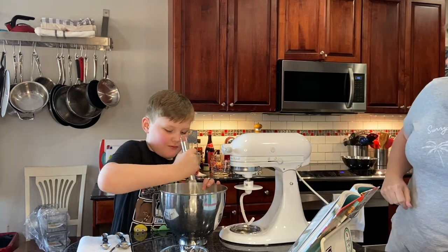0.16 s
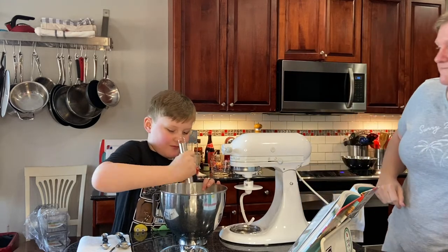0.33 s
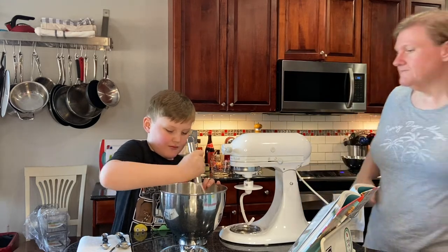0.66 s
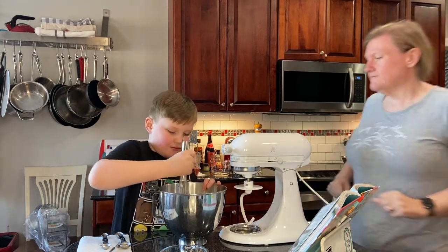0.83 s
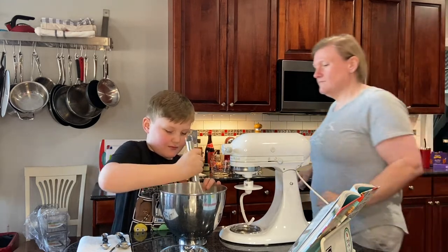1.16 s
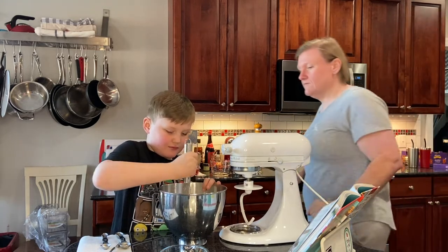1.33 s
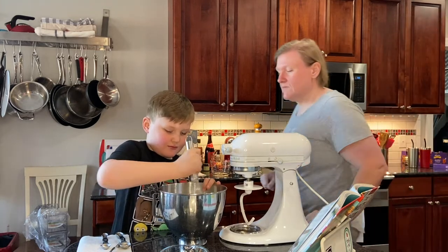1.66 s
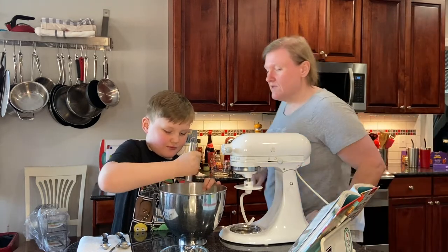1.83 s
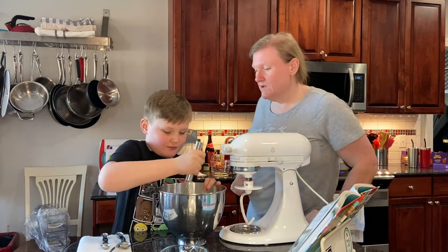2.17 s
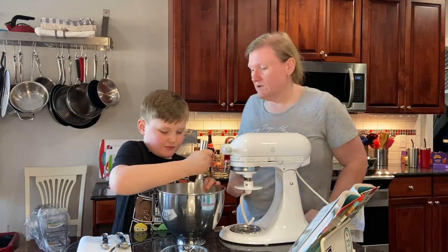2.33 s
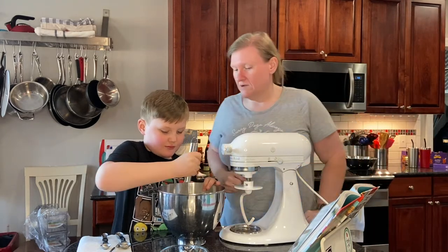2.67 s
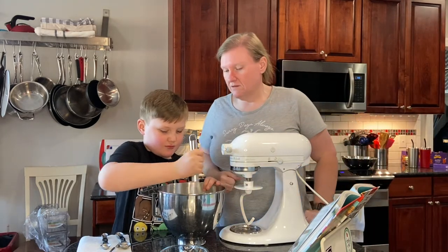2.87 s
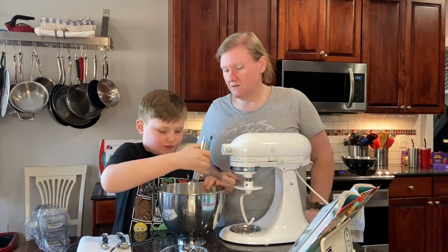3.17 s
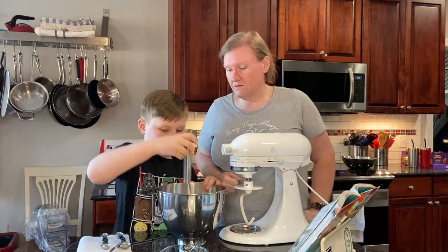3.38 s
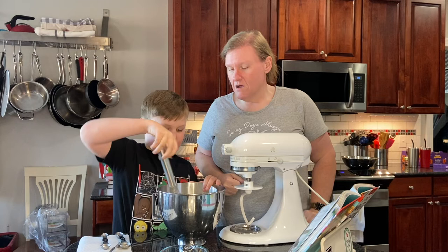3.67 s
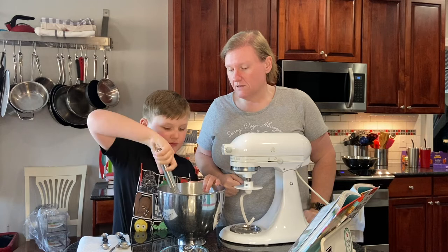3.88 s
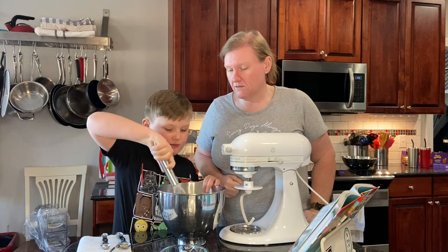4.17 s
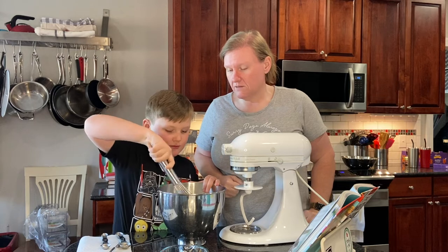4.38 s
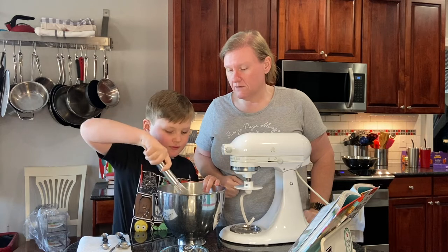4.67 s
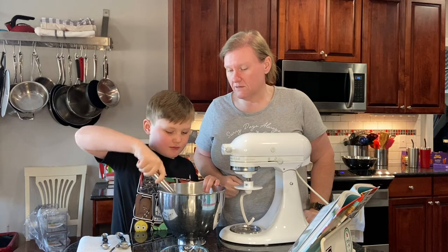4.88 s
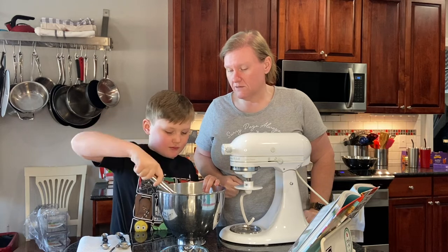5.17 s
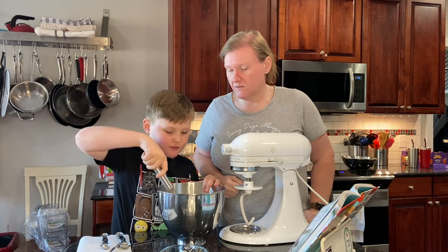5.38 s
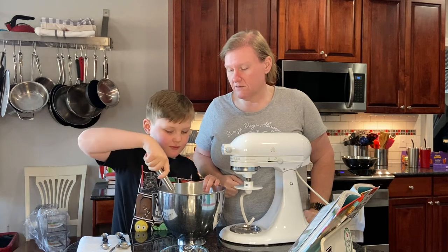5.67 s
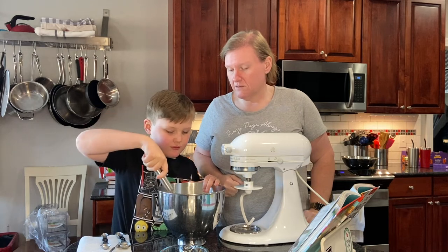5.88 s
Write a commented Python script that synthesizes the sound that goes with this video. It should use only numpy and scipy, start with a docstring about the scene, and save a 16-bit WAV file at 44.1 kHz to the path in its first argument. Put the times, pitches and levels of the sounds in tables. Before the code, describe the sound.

In a hard-walled home kitchen, a wire whisk drags through dry ingredients in a steel bowl. Bright, scratchy swishes come in uneven strokes with light ticks, small pings and a soft rustle, busiest in the first three seconds. Stirring thins out, then one hard knock near five seconds makes the bowl ring. Dull soft thuds and a faint low hum sit beneath, picked up by a phone at moderate distance.

```python
"""A hard-walled kitchen: a wire whisk is dragged round a steel bowl of dry mix, heard by a phone. The strokes
are bursts of uneven random slips through wire resonances, with a rustle of mix beneath. Wires tick and clack on
the wall among short damped notes of wires and bowl, and the scene opens on a fading clang; damped sines ring
and rock the bowl, most strongly at one knock near five seconds. A few soft thuds are low decaying sines with a
scuff. Everything struck feeds a diffuse noise tail, over room tone and a wavering low hum of filtered noise."""
import sys
import numpy as np
from scipy import signal
from scipy.fft import rfft, irfft, next_fast_len
from scipy.io import wavfile
from scipy.ndimage import uniform_filter1d, map_coordinates

SR = 44100
rng = np.random.default_rng(int(sys.argv[2]) if len(sys.argv) > 2 else 0)


def master(y):
    """Save y as 16-bit WAV."""
    cut = np.clip(np.atleast_2d(y).T, -1, 1)
    pcm = np.round(cut * 32767)  # scale
    wavfile.write(sys.argv[1], SR, pcm.astype(np.int16))


N = 264952
SIZE = next_fast_len(N + SR)  # transform length: the scene plus one second of echo
FREQ = np.maximum(np.arange(SIZE // 2 + 1) * SR / SIZE, 1.)  # Hz of each bin
CONTACT_S = 0.0011  # time constant of a wire pressing home

# Strokes of the whisk, levels before each layer's trim. Each row: start in seconds, rise in seconds
# (3 ms at least), hold in seconds, wire hiss in dB, fine grit in dB relative to the hiss,
# coarse drag in dB relative to the hiss, rustle of the mix in dB.
STROKES = [(0, 0.0017, 0.073, -53, -36, -4, -44), (0.063, 0.055, 0.038, -42, -12, -15.5, -57),
           (0.239, 0.029, 0.0026, -35.5, -13.5, -43, -60), (0.483, 0.0034, 0.072, -43.5, -16, -16, -61.5),
           (.555, 0.019, 0.055, -43, -16, -16, -74), (0.619, 0.036, 0.049, -40, -13, -15.5, -60),
           (0.838, 0.0072, 0.031, -50.5, -12, -25, -51), (0.986, 0.0065, 0.1, -55, -14, -23, -71),
           (1.198, 0.012, 0.066, -45.5, -22, -14, -79), (1.436, 0.007, 0.056, -42.5, -10, -21, -62.5),
           (1.47, 0.014, 0.16, -36, -11.5, -11.5, -53), (1.654, 0.02, 0.0081, -36.5, -14, -6.5, -55),
           (1.766, 0.017, 0.064, -60.5, -8, -5.5, -57), (1.84, 0.078, 0.045, -39, -12, -13, -59.5),
           (1.99, 0.021, 0.0053, -39.5, -19, -15, -60), (2.091, 0.0026, .04, -38, -10, -19, -56.5),
           (2.119, 0.038, 0.045, -35.5, -9, -11.5, -56), (2.28, 0.017, 0.081, -41, -7, -12, -58),
           (2.328, 0.055, 0.059, -33.5, -10.5, -8.5, -52.5), (2.46, 0.019, 0.0073, -42, -19, -12, -50.5),
           (2.55, 0.016, 0.018, -34.5, -13, -12, -77), (2.645, 0.0028, 0.0037, -33.5, -10, -24, -49.5),
           (2.689, 0.044, 0.084, -41.5, -11.5, -10, -49.5), (3.02, 0.0099, 0.016, -42.5, -7, -31, -68),
           (3.235, 0.017, 0.0048, -59, -27, -33, -85), (3.215, 0.03, 0.14, -87, -4, -11, -71.5),
           (3.539, 0.028, .01, -53, -23, -25, -69.5), (3.654, 0.039, 0.01, -36, -15, -30, -56.5),
           (3.85, 0.064, 0.01, -58.5, -17, -21, -71.5), (4.10, 0.023, 0.014, -96, -17, -21.5, -70.5),
           (4.28, 0.063, 0.008, -53, -7, -36, -88), (4.45, 0.027, .005, -59, -15, 4.5, -70),
           (4.52, 0.014, 0.0071, -42, -8, -1, -78), (4.57, 0.018, 0.0061, -37.5, -14, -28, -82),
           (4.811, 0.018, 0.0041, -57, -10, -26, -97), (4.989, 0.022, 0.075, -34.5, -12.5, -5.5, -74),
           (5.21, 0.011, 0.0046, -56, -29, -5, -80), (5.579, 0.015, 0.0067, -59.5, -27.5, -4, -63.5),
           (5.635, 0.015, 0.0041, -54, -23, -29, -82), (5.705, 0.019, 0.026, -67, -27.5, -5, -69),
           (5.848, 0.035, 0.04, -52.5, -19, -4.5, -59.5)]


def undb(db):
    """Gain of a level in dB."""
    return 10 ** (np.asarray(db) / 20)


def level(x, db):
    """Scale to an rms level."""
    return x * undb(db) / np.sqrt(np.mean(x ** 2))


def along(table):
    """A (Hz, value) table read on every frequency bin, along log frequency."""
    hz, value = np.transpose(table)
    return np.interp(np.log(FREQ), np.log(hz), value)


def colour(x, table):
    """Causal minimum-phase filter shaped by a (Hz, dB) table; white noise keeps its rms."""
    cepstrum = irfft(np.log(undb(along(table))), SIZE)
    # Folding the cepstrum forward in time makes the filter causal.
    cepstrum[1:SIZE // 2] *= 2
    cepstrum[SIZE // 2 + 1:] = 0
    gain = np.exp(rfft(cepstrum))
    gain = gain / np.sqrt(np.mean(np.abs(gain) ** 2))
    return irfft(rfft(x, SIZE) * gain, SIZE)[:N]


def resonate(x, hz, width_hz):
    """One resonance, gain 1 at its centre."""
    return signal.lfilter(*signal.iirpeak(hz, hz / width_hz, SR), x)


def walk(rate):
    """Random levels held 1 / rate s and slewed twice; the spread is about 0.7."""
    hold = int(SR / rate)
    steps = np.repeat(rng.standard_normal(N // hold + 1), hold)
    return 0.95 * uniform_filter1d(uniform_filter1d(steps, hold), hold)[:N]


def add(track, s, sound):
    """Mix a sound into the track at a time in seconds."""
    i = int(s * SR)
    track[i:i + len(sound)] += sound[:N - i]


def patchy(x, range_hz, width_hz, patchy_db, rate, count):
    """Resonances strewn evenly over a range; the level of each wanders so that it comes and goes."""
    low, high = range_hz
    places = (np.arange(count) + rng.random(count)) / count
    total = np.zeros(len(x))
    for hz in low + places * (high - low):
        gain = undb(patchy_db * np.clip(walk(rate), -3, 2))
        total += gain * resonate(x, hz, width_hz)
    return total


def wobble(db):
    """Slow chance in the level and phase of one ring, as a complex gain."""
    rate, waver_rad = 40., 0.55  # changes per second; phase depth, heard as wavering pitch
    return undb(db * walk(rate)) * np.exp(1j * waver_rad * walk(rate))


def modes(table, db, share, rise_s, flutter):
    """Damped sines of (Hz, dB, free t60) rows after one blow, each times its flutter."""
    hz, own_db, free_t60 = np.transpose(table)[:, :, None]
    t60 = free_t60 * share
    t = np.arange(min(int(np.max(t60) * SR), flutter.shape[1])) / SR
    start = flutter[:, :1]
    moving = flutter[:, :len(t)] * np.abs(start) / start  # every sine starts at phase zero
    sines = np.imag(np.exp(2j * np.pi * hz * t) * moving)
    ring = undb(own_db + db - 60 * t / t60) * sines
    return np.sum(ring, axis=0) * (1 - np.exp(-t / rise_s))


def background():
    """Room tone is coloured noise that breathes slowly; the hum is noise in a narrow low resonance."""
    # Spectrum of the room tone. Each row: frequency in Hz, gain in dB.
    floor = [(20, -20), (45, -6), (70, -5.5), (130, -12), (220, -16.5), (400, -32), (1000, -36),
             (2500, -43.5), (5000, -39), (8000, -37.5), (11000, -42.5), (15600, -40), (16000, -77.5)]
    # Rise and fall of the hum, before its waver. Each row: time in seconds, level in dB.
    hum_levels = [(0, -48.5), (1.3, -53.5), (2.7, -49), (3.2, -65), (3.6, -51), (4.502, -55.5),
                  (5.201, -49.5), (6.01, -57)]
    floor_db, breath_db, breaths_per_s = -58, 1.5, 3.8
    hum_hz, width_hz = 91.8, 25.4
    waver_db, wavers_per_s = 3.5, 7.58
    tone = level(colour(rng.standard_normal(N), floor), floor_db) * undb(breath_db * walk(breaths_per_s))
    hum = resonate(rng.standard_normal(N), hum_hz, width_hz)
    hum = resonate(hum, hum_hz, 1.8 * width_hz)
    swell = np.sqrt(uniform_filter1d(hum ** 2, size=6000))  # its own swings are evened out
    hum_db = np.interp(np.arange(N) / SR, *np.transpose(hum_levels)) + waver_db * walk(wavers_per_s)
    return tone + undb(hum_db) * hum / swell


def dragged(slips):
    """Slips through the whisk: plain, in broad patches as wires come and go, and in thin loop rings."""
    # Range in Hz over which the many short rings of the loops lie at random: low, high.
    wires_hz = (4580, 11000)
    broad = patchy(slips, wires_hz, 230, 8.2, 24.1, count=14)
    thin = patchy(slips, wires_hz, 51, 6.0, 21, count=20)
    return level(slips, -6.0) + level(broad, -2.7) + level(thin, -1.0)


def played(db, fall_db_s):
    """Gain of all strokes: a rise, a hold, then a steady fall; overlapping strokes add in power."""
    rise_db = 20.5  # a stroke climbs this far during its rise
    t = np.arange(0, N / SR + .002, .001)
    power = np.zeros(len(t))
    for (s, rise, hold, *_), top_db in zip(STROKES, db):
        top = s + max(rise, .003)
        times = [s, top, top + hold, top + hold + 1]
        levels = [top_db - rise_db, top_db, top_db, top_db - fall_db_s]
        power += undb(np.interp(t, times, levels, left=-200)) ** 2
    return np.interp(np.arange(N) / SR, t, np.sqrt(power))


def strokes(slips, whisk):
    """Grains slip under the wires in dense uneven clicks that excite the loops and the wall."""
    # Tone of the wire hiss, fine grit, coarse drag and mix. Each row: frequency in Hz, gain in dB.
    hiss_tone = [(4000, -42.5), (5400, -11), (6300, -0.5), (8000, 6), (9300, -4), (10300, -11.5),
                 (12000, -41)]
    grit_tone = [(8500, -42), (10500, 2.5), (12500, -5), (15600, 8.5), (16000, -54.5)]
    drag_tone = [(2500, -20.5), (4300, -9.5), (4750, -8.5), (5500, 0.5), (6200, 1), (7200, -27.5)]
    rustle_tone = [(120, -11.5), (270, 1), (700, -3.5), (1400, -1.5), (2200, -12), (3000, -17.5),
                   (4500, -6), (6000, -33)]
    # Range in Hz of the wall's damped rings under the mix: low, high.
    wall_hz = (213, 3402)
    wires_fall, mix_fall = 281, 138  # dB per second: the wires stop quickly, the mix settles slowly
    settle_db, settle_fall = -37, 76  # stirred grains trickle on, quieter, falling in dB per second
    glide, glides_per_s = .07, 9  # the rings slide in pitch as the whisk travels round

    hiss = level(colour(whisk, hiss_tone), 0)
    grit = level(colour(slips * undb(2.0 * walk(26)), grit_tone), 0.37)
    drag = level(colour(whisk, drag_tone), 4.33)

    slide = rng.standard_normal(N) * undb(3.0 * walk(90) + 2.2 * walk(300))
    rings = patchy(slide, wall_hz, 43, 10.0, 26.98, count=36)
    # Reading the rings at an uneven speed bends their pitch.
    position = np.cumsum(1 + glide * walk(glides_per_s))
    rings = map_coordinates(rings, [position], order=1, mode="mirror")
    rustle = level(colour(level(slide, -9) + level(rings, 0), rustle_tone), 0)

    *_, hiss_db, grit_db, drag_db, rustle_db = np.transpose(STROKES)
    total = played(rustle_db, mix_fall) * rustle
    for sound, db in [(hiss, hiss_db), (grit, hiss_db + grit_db), (drag, hiss_db + drag_db)]:
        stroke = played(db, wires_fall)
        trickle = played(db + settle_db, settle_fall)
        total += (stroke + trickle) * sound
    return total


def pings():
    """Short damped notes of single wires, patches of wall and the bowl, each sounding one pitch; at the start
    several low notes ring on from a clang of the bowl that is already fading."""
    # Each row: start in seconds, level in dB, pitch in Hz, free t60 in seconds (a share of it sounds).
    notes = [(0, -38, 774, 0.33), (0, -38.5, 848, 0.55), (0, -42, 928, 0.6), (0, -41.5, 986, 0.73),
             (0, -42, 1055, .45), (0, -40, 1140, 0.36), (0, -47, 1660, 0.23), (0, -37.5, 3377, 0.13),
             (0.254, -53.5, 1534, 0.11), (0.2903, -25, 2414, 0.0038), (1.169, -41, 1750, 0.0086),
             (2.095, -33, 4850, 0.055), (2.097, -27, 7400, 0.086), (2.154, -41.5, 1560, 0.033),
             (2.165, -45, 4290, 0.085), (2.17, -52.5, 976, 0.22), (2.2, -53, 550, .18),
             (2.285, -48, 874, .12), (2.41, -48.5, 1203, 0.15), (2.61, -42, 200, .25),
             (2.181, -45, 1580, .05), (2.553, -40, 1450, 0.092), (2.554, -33, 5580, 0.071),
             (2.983, -36, 1680, 0.0078), (3.026, -37.5, 1337, 0.064), (3.028, -42, 3510, 0.077),
             (3.062, -44, 2670, 0.067), (3.068, -47, 1320, 0.049), (3.025, -27.5, 5690, 0.058),
             (3.259, -38, 8060, 0.018), (3.338, -39, 2020, 0.0072), (4.291, -50, 718, 0.11),
             (4.334, -45, 8100, 0.22), (4.346, -54, 1830, 0.046), (4.35, -58, 2610, 0.04),
             (4.358, -57.5, 1455, .06), (4.47, -52.5, 1180, 0.042), (4.53, -44.5, 1430, 0.055),
             (4.532, -44.5, 786, 0.11), (4.585, -43.5, 568, 0.085), (4.59, -50, 950, .07),
             (4.665, -55.5, 1730, 0.047), (4.68, -55, 1048, 0.057), (4.827, -58.5, 1445, 0.066),
             (4.587, -40.5, 8230, 0.33), (4.589, -47, 7500, .25), (4.978, -39, 3376, 0.87),
             (5.65, -44.5, 4435, 0.028), (5.72, -48.5, 7100, 0.071), (5.73, -63, 2700, 0.059),
             (5.885, -47, 8130, .15), (5.89, -52, 5250, 0.21)]
    flutter = np.array([wobble(4.5) for _ in range(4)])  # these notes flutter more than the bowl's modes
    out = np.zeros(N)
    for k, (s, db, hz, t60) in enumerate(notes):
        moving = flutter[k % 4, None, int(s * SR):]
        add(out, s, modes([(hz, db, t60)], 0, 0.85, CONTACT_S, moving))
    return out


def hits(whisk):
    """Each touch rattles the wires, clacks, rocks the bowl and rings it; mix and hand shorten the ring."""
    # Wires meeting the wall, levels before trims. Each row: start in seconds, tick in dB, clack in dB,
    # rocking in dB, low bowl ring in dB, high bowl ring in dB.
    contacts = [(0.031, -50, -37.5, -60, -55, -55), (0.069, -55, -42, -62, -60, -60),
                (0.0014, -35.5, -30.5, -41, -36.5, -46), (0.2564, -37, -50.5, -50, -72, -72),
                (0.488, -39, -56.5, -35, -46, -84), (0.698, -66, -58, -41, -66, -75),
                (0.84, -38, -67, -52.5, -70, -62), (0.999, -38.5, -55, -45, -83, -56),
                (1.2094, -22.5, -58, -42.5, -66, -58), (1.4394, -57, -74, -46, -72, -72),
                (1.484, -44, -62, -47.5, -63, -60), (1.7726, -63, -58, -64, -45, -79),
                (1.874, -32, -80, -79, -51, -45), (2.094, -23, -59, -39, -77, -60),
                (2.284, -27, -52, -62, -74, -53), (2.322, -60, -56, -44, -80, -70),
                (2.552, -13, -43, -34.5, -75, -47), (2.645, -25.5, -73, -49, -73, -67),
                (3.0162, -25.5, -44.5, -49, -61, -62), (3.025, -28, -44, -43, -58, -50),
                (3.067, -36, -47, -51, -52, -52), (3.078, -27, -54, -51, -67, -52),
                (3.667, -62, -58, -48, -72, -70), (3.702, -43, -48.5, -49.5, -74, -64),
                (3.728, -53, -62, -42.5, -65, -70), (3.925, -60, -62.5, -56.5, -78, -70),
                (4.2895, -35, -61.5, -61.5, -72, -81), (4.3393, -27.5, -63, -55.5, -69.5, -73),
                (4.468, -27.5, -73, -53, -68, -64.5), (4.476, -35, -69, -62, -70, -70),
                (4.529, -29, -33.5, -41.5, -42, -46), (4.538, -35.5, -38.5, -48, -49.5, -51.5),
                (4.555, -48.5, -49.5, -49.5, -56, -59.5), (4.588, -19.5, -43, -46.5, -64.5, -57.5),
                (4.8257, -45.5, -65.5, -54, -71, -62.5), (4.9771, -4.5, -15.5, -33.5, -11, -21),
                (4.9863, -17, -22, -36, -17, -27), (5.0053, -25, -24, -39, -14.5, -38.5),
                (5.0451, -30.5, -26.5, -34.5, -23, -42.5), (5.1122, -34.5, -34, -42.5, -30.5, -46.5),
                (5.597, -59, -55, -79, -71, -63.5), (5.653, -44, -62, -61, -77, -72),
                (5.7196, -63, -61.5, -65.5, -86, -75), (5.883, -53, -48, -61.5, -53, -69.5),
                (5.9098, -49.5, -60, -44, -71.5, -68)]
    # Modes of the bowl, then of the bowl rocking on its foot.
    # Each row: frequency in Hz, level in dB, free t60 in seconds.
    bowl = [(242, -21.5, 0.58), (318.8, -13, 0.26), (355, -25.5, .3), (526, -24, 0.4), (584, -22, .3),
            (640, -23, 0.35), (761, -23, 0.24), (792, -25.5, 0.28), (900, -21, 0.41), (948, -20, 0.57),
            (1017, -17.5, 0.71), (1180, -14.5, 0.57), (1238, -10.5, 0.85), (1272, -1, 0.3),
            (1284, -4, 0.73), (1362, -12.5, 0.6), (1387, -15, 0.72), (1464, -6, 0.53), (1866, -7, 0.37),
            (2010, -13.5, 0.45), (2112, -13.5, 0.25), (2340, -18.5, 0.22), (2518, -10.5, 0.35),
            (2654, -12.5, 0.2), (2767, -16, 0.41), (3110, -13.5, 0.3), (3980, -17, 0.23),
            (4770, -16.5, 0.2)]
    seat = [(204.2, -2, 0.39), (380.5, 2, 0.18), (439, -15, 0.17), (532.6, -6.5, 0.23), (859, -8.5, 0.2),
            (1207, -23, 0.1)]
    # Frequencies in Hz where the low and the high ring level apply, blended between: low, high.
    ring_bands_hz = [1300, 2600]
    # A hard blow throws the bowl clear of mix and hand.
    # Each row: low ring level in dB, share of the free ring time.
    ring_share = [(-44.5, 0.12), (-14, 0.67)]
    # Tone of the tick and of the clack. Each row: frequency in Hz, gain in dB.
    tick_tone = [(500, -26), (1500, -24), (3500, -25), (5000, 2.5), (7800, 0), (10000, -6), (13000, -9.5),
                 (15700, -1.5), (16500, -27)]
    clack_tone = [(200, -16), (330, -4.5), (500, -0.5), (1000, 3.5), (1800, -4.5), (3000, -11), (4500, -4),
                  (7000, -22.5)]
    tick_hz, tick_scatter, tick_t60_s = 7800, 0.035, 0.054  # each tick has its own centre near this
    crack_db, crack_t60_s = -6, 0.0043  # the first instant of a tick is a broad crack
    bowl_scatter_db, seat_scatter_db = 1.2, 3
    seat_share, seat_rise_s = 0.51, 0.0089  # share of the free rocking time; the rocking blooms slowly
    flutter_db = 2.5  # loose mix and the hand make every mode flutter

    t = np.arange(int(.4 * SR)) / SR
    wires = level(colour(whisk, tick_tone), -7.0)
    rattle, clack, ring = np.zeros((3, N))
    n = len(bowl)
    # Every place on the wall favours other modes; the last column scatters the tick's centre.
    spot = rng.standard_normal((len(contacts), len(bowl + seat) + 1, 1))
    log_hz = np.log(np.array(bowl)[:, :1])
    flutter = np.array([wobble(flutter_db) for _ in bowl + seat])
    fade_db = 60 * t / tick_t60_s
    for (s, tick_db, clack_db, rock_db, *ring_db), place in zip(contacts, spot):
        shaken = np.resize(wires[int(s * SR):], len(t))
        centred = resonate(shaken, tick_hz * (1 + tick_scatter * place[-1, 0]), 1300)
        add(rattle, s, undb(tick_db - fade_db) * (0.63 * shaken + 0.24 * centred))
        add(rattle, s, undb(tick_db + crack_db - 60 * t / crack_t60_s) * shaken)
        # The clack is only an envelope here; noise fills it below.
        add(clack, s, (1 - np.exp(-t / CONTACT_S)) * undb(clack_db - 0.78 * fade_db))

        moving = flutter[:, int(s * SR):]
        share = np.interp(ring_db[0], *np.transpose(ring_share))
        bowl_db = np.interp(log_hz, np.log(ring_bands_hz), ring_db) - 2.5
        bowl_db = bowl_db + bowl_scatter_db * place[:n]
        add(ring, s, modes(bowl, bowl_db, share, CONTACT_S, moving[:n]))
        seat_db = rock_db + seat_scatter_db * place[n:-1]
        add(ring, s, modes(seat, seat_db, seat_share, seat_rise_s, moving[n:]))
    clack = clack * rng.standard_normal(N) * undb(2.0 * walk(150))
    woken = patchy(clack, (247.4, 4854), 73, 3, 11, count=30)  # short rings in the wall
    clack = undb(-4.5) * clack + undb(-1.5) * woken
    return rattle + colour(clack, clack_tone) + ring


def thuds():
    """Dull pushes through floor and counter: a damped low swing with a muffled scuff."""
    # Each row: start in seconds, level of the swing in dB, pitch in Hz, t60 in seconds,
    # time constant of the rise in seconds.
    pushes = [(0.7, -34.5, 118, 0.15, 0.0078), (.79, -40.5, 140, 0.095, 0.0055),
              (1.251, -43.5, 102, 0.08, 0.0069), (1.412, -41, 130, 0.14, 0.025),
              (2.31, -45, 98, 0.22, 0.0061), (2.645, -39, 170, 0.13, .01), (3.066, -46, 140, 0.095, 0.0066),
              (4.294, -41, 97, 0.12, 0.011), (4.329, -46.5, 120, 0.11, 0.0097),
              (4.5, -45, 130, 0.13, 0.013), (4.545, -44, 151, 0.14, .008), (4.98, -38, 139, 0.26, .004),
              (5.346, -43, 102, 0.09, 0.0024), (5.9, -38.5, 99, 0.085, 0.0034)]
    t, out = np.arange(int(.4 * SR)) / SR, np.zeros(N)
    for s, db, hz, t60, rise_s in pushes:
        lowpass = signal.butter(2, 2.16 * hz, fs=SR, output="sos")
        scuff = level(signal.sosfilt(lowpass, rng.standard_normal(len(t))), 5.1)
        swing = np.sin(2 * np.pi * hz * t)
        rise = 1 - np.exp(-t / rise_s)
        add(out, s, undb(db - 60 * t / t60) * rise * (swing + scuff))
    return out


def echo():
    """Spectrum of one diffuse kitchen tail: octave bands of noise, each fading at its own rate."""
    # Each row: frequency in Hz, t60 in seconds.
    room_t60 = [(100, 0.67), (1000, 0.48), (4000, 0.49), (9000, 0.078), (15000, 0.099)]
    room_hz, room_s = np.transpose(room_t60)
    t, tail = np.arange(SR) / SR, np.zeros(SR)
    spectrum = rfft(rng.standard_normal(SR), SIZE)
    for octave in range(10):
        hz = 40 * 2 ** octave
        band = np.clip(1 - np.abs(np.log2(FREQ / hz)), 0, 1)
        t60 = np.interp(np.log(hz), np.log(room_hz), room_s)
        tail += irfft(spectrum * band, SIZE)[:SR] * undb(-60 * t / t60)
    tail = tail * np.clip(t / 0.005, 0, 1)  # builds up over 5 ms
    return rfft(tail / np.sqrt(np.sum(tail ** 2)), SIZE)


def smooth(v):
    """Average twice over neighbouring frequency bins."""
    return uniform_filter1d(uniform_filter1d(v, size=900), size=900)


def ports(shared, apart):
    """Two microphone ports: a common part, an opposed part, and the left one a little late."""
    # How alike the two ports are. Each row: frequency in Hz, likeness from 0 to 1.
    likeness = [(60, 1), (250, 0.91), (600, 0.3), (1300, 1), (3000, 0), (5000, 0.97), (8500, 0.94),
                (10500, 1), (12200, 1), (14200, .7), (16000, 0.92)]
    # Each row: frequency in Hz, left minus right in dB.
    balance = [(30, -1.5), (100, 2.5), (300, 4), (1200, 1), (2600, 1.5), (5000, 0), (16000, -0.5)]
    # Phase by which the left port trails, before smoothing. Each row: frequency in Hz, lag in radians.
    left_lag = [(20, 0), (250, 0.16), (600, 1.2), (1300, 1.32), (2200, 1), (4000, 1.56), (4700, 3.5),
                (6000, 4), (8300, 6), (9600, 7), (11200, 8.5), (13200, 10), (14800, 11.5), (16400, 22)]
    like = along(likeness)
    mid = smooth(np.sqrt((1 + like) / 2)) * shared
    side = smooth(np.sqrt((1 - like) / 2)) * apart
    tilt = undb(along(balance) / 2)
    left = (mid + side) * tilt * np.exp(-1j * smooth(along(left_lag)))
    right = (mid - side) / tilt
    return irfft(np.array([left, right]), SIZE)[:, :N]


def scene():
    """Whisk, bowl and thuds in the kitchen's echo, over the room tone."""
    slips = rng.standard_normal(N) * undb(3.4 * walk(400) + 2.2 * walk(60))
    whisk = dragged(slips)
    near = rfft(strokes(slips, whisk) + pings() + hits(whisk) + thuds(), SIZE)
    shared = near * (1 + undb(-10.5) * echo()) + rfft(background(), SIZE)
    apart = near * undb(-4.5) * echo() + rfft(background(), SIZE)
    return ports(shared, apart)


def record(dry):
    """The phone drops the deepest bass and cuts the top."""
    bass_cut = signal.butter(3, 42, "high", fs=SR, output="sos")
    top_cut = signal.ellip(10, .2, 80, 16600, fs=SR, output="sos")
    return signal.sosfilt(top_cut, signal.sosfilt(bass_cut, dry))


dry = scene()
out = record(dry)
master(out)
```